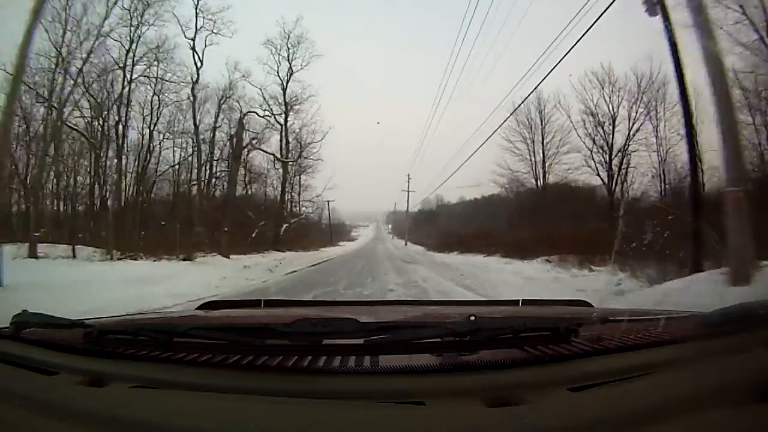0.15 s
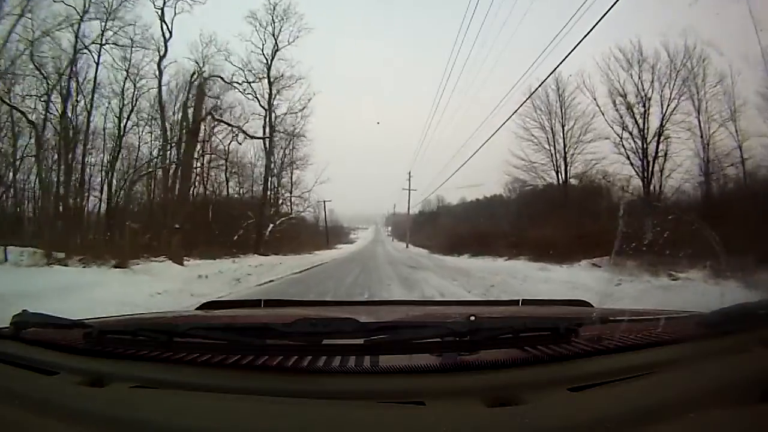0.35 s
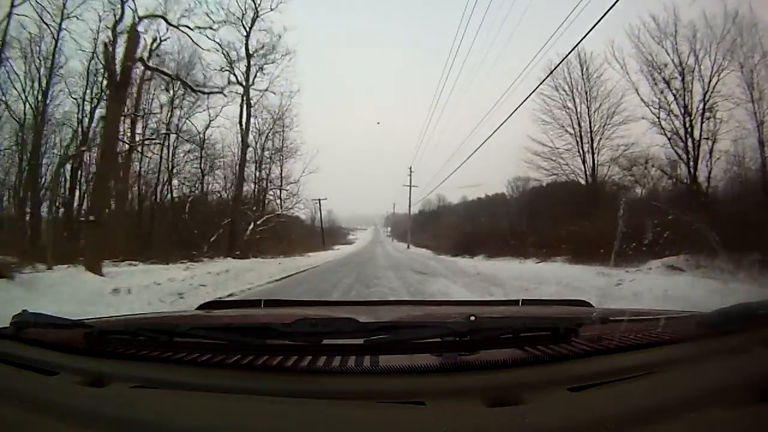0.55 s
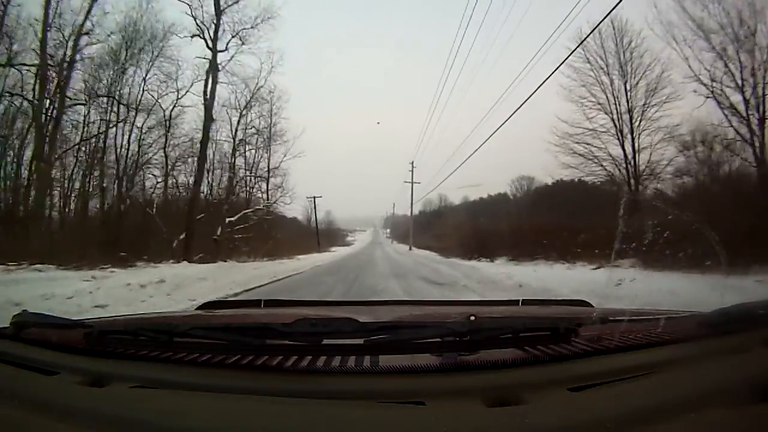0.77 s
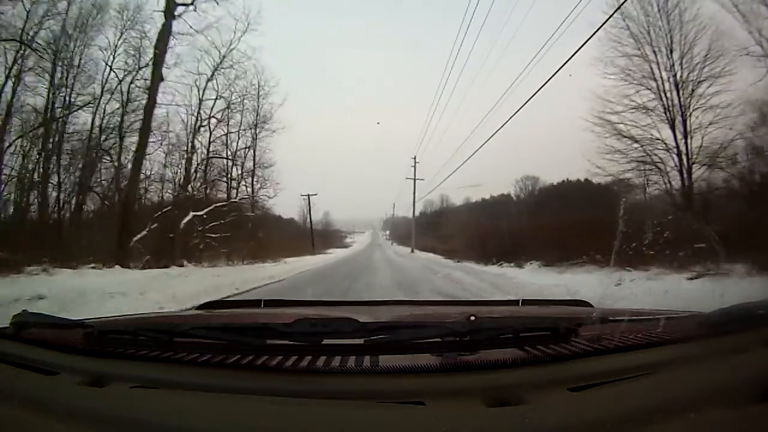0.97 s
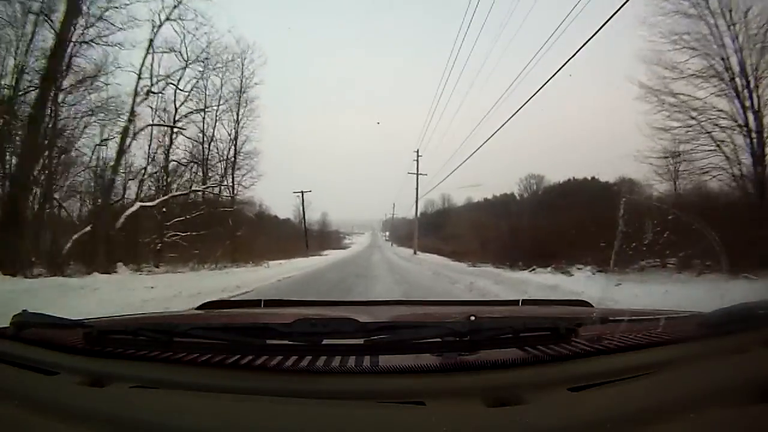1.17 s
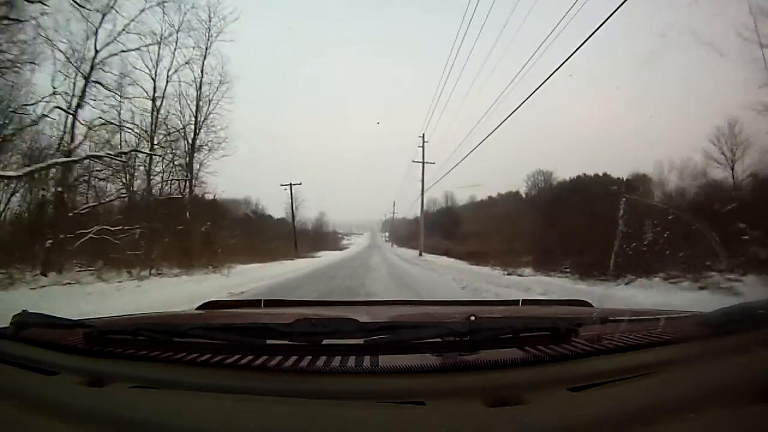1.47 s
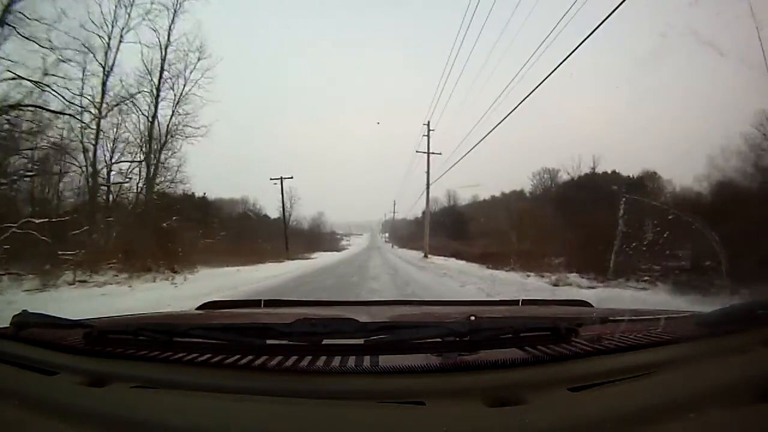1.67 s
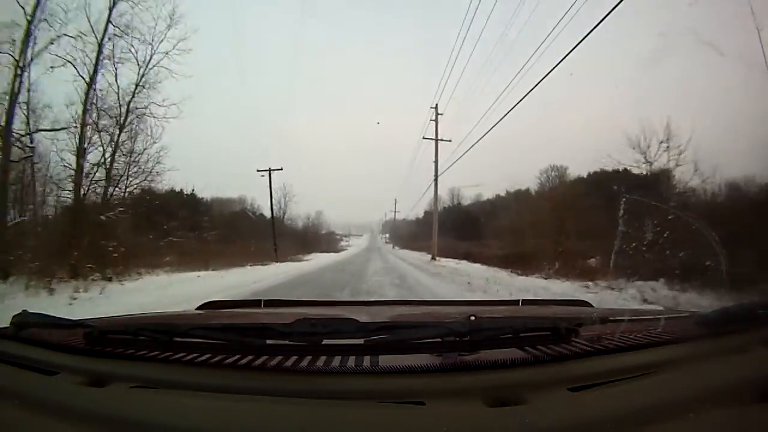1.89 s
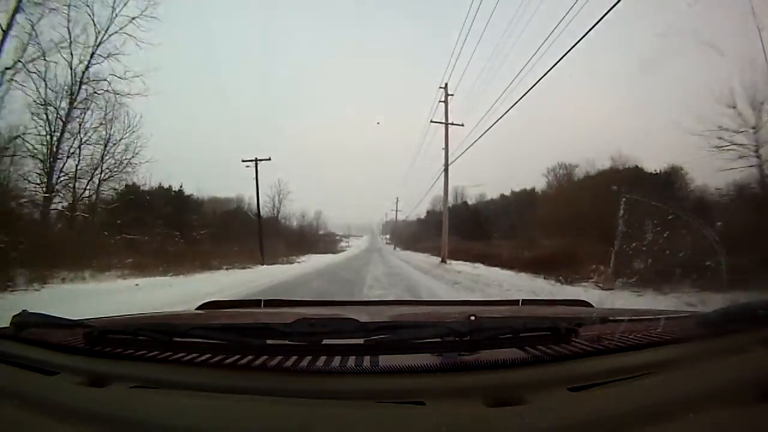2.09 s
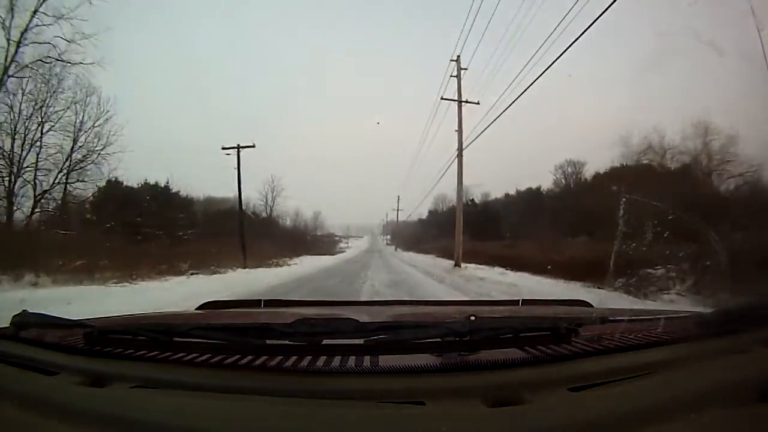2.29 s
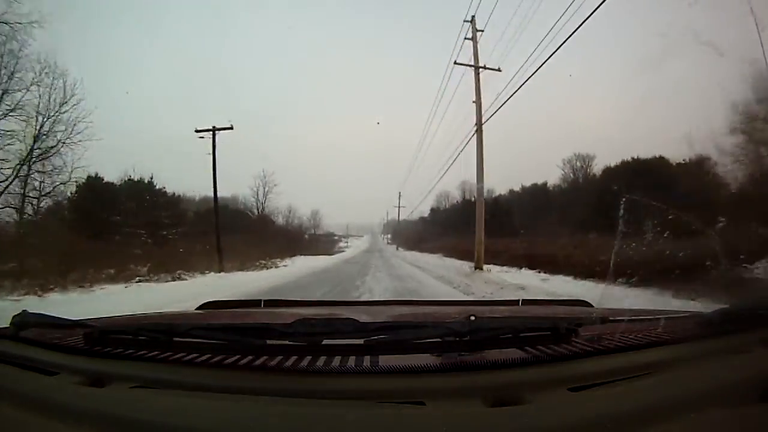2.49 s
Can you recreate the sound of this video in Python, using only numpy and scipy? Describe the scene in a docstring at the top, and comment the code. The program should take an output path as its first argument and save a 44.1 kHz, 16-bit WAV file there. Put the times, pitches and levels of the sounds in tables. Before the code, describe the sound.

Steady low engine hum and tyre rumble inside a moving car, with dull thuds and faint ticks

```python
"""Inside a car on a rough winter road, heard at the windscreen by the microphone of a small dash camera.
Phase-locked engine orders drone, two of them strong, over tyre and body rumble of coloured noise.
Road bumps thud through the floor as soft pulses; late on, a loose plastic part ticks as a few ringing modes.
The camera starts silent and fades in, its gain control steps down after broad peaks with a faint click,
and it samples slowly, holding each sample flat."""
import sys
import numpy as np
from scipy import signal
from scipy.fft import rfft, irfft
from scipy.io import wavfile
from scipy.ndimage import uniform_filter1d

SR = 44100
rng = np.random.default_rng(int(sys.argv[2]) if len(sys.argv) > 2 else 0)


def wav_record(signal):
    """Record a signal, one row per channel, as 16-bit PCM in the file named by sys.argv[1]."""
    frames = np.transpose(np.atleast_2d(signal))
    bounded = np.clip(frames, -1, 1)
    # unit amplitude maps onto the largest positive 16-bit level
    quanta = np.round(bounded * 32767).astype(np.int16)
    wavfile.write(sys.argv[1], SR, quanta)


N = 116424  # length in samples

# Engine: shaft speed/Hz, its gain/(Hz/s), the easing of that gain/(Hz/s^2), starting angle/turns
SPEED_HZ, GAIN_HZ_PER_S, EASE_HZ_PER_S2, START_TURNS = 38.029, .846, -.129, -.247
# Engine orders [multiple of shaft speed, rms level/dB, phase/turns]
ENGINE_ORDERS = [(2, -17, -0.0026), (3, -24.5, -0.17), (4, -41.5, 0.073), (5, -37.5, 0.15)]
WAVER_DB = 0.45  # rms drift of each order

# Spectrum of the road rumble without resonances [f/Hz, relative density level/dB]
ROAD_SPECTRUM = [(12, -53.5), (22, -31.5), (30, -32.5), (60, -33.5), (140, -41), (260, -46.5), (400, -52),
                 (620, -58), (1000, -63), (1450, -66.5), (1560, -75.5), (2300, -76.5), (3000, -77),
                 (4000, -82.5), (5000, -80.5), (6500, -80)]
# Cabin and body resonances, negative for dips [f/Hz, width/Hz, lift/dB]
CABIN_RESONANCES = [(38.1, 9, 5.5), (47.3, 9, 8), (166.6, 12, -4.5), (1010, 72, -6.5), (197.7, 43.4, 8.5),
                    (315.9, 25, 9.5), (532.7, 64, 6.5), (699, 60, 3.5), (1095, 47, 5), (1698, 91, 6.5),
                    (1954, 94, 6.5)]
# Roughness of the road over time, used relative to its mean [t/s, level/dB]
ROAD_ROUGHNESS = [(0.1, -31.5), (0.15, -32), (0.48, -29), (0.53, -22), (0.63, -36), (0.68, -30),
                  (1.49, -30), (1.52, -27.5), (1.57, -31), (1.59, -27.5), (1.82, -29.5), (1.92, -22),
                  (1.94, -28), (2.31, -28), (2.36, -29.5), (2.55, -33), (2.61, -20.5), (2.63, -35.5)]
ROAD_DB, SWELL_DB = -22, .5  # rumble level and its slow rms drift
LUMP_DB, ROUGH_SHARE = 1, .8  # rms of the random lumps, share of the roughness curve
LUMP_HZ = 500  # lumps and roughness act half as strongly here, less above

# Road bumps [t/s, push as signed peak amplitude, pitch/Hz]
ROAD_BUMPS = [(.113, .17, 90), (.385, .16, 80), (.561, -.32, 120), (.894, .15, 110), (1.009, .15, 100),
              (1.058, .2, 80), (1.131, -.12, 120), (1.265, .4, 90), (1.464, -.17, 90), (1.537, .24, 100),
              (1.741, .34, 80), (1.92, .2, 170), (1.9765, -.36, 85), (2.047, .17, 90), (2.11, .26, 70),
              (2.252, .19, 90), (2.409, -.22, 80), (2.485, -.18, 100), (2.613, -.2, 110)]
SWING = .9  # strength of the swing back

# Ticks of the loose plastic part [t/s, level/dB]
PLASTIC_TICKS = [(2.4612, -40), (2.464, -40.5), (2.473, -44)]
# Ringing modes of that part [f/Hz, level relative to the tick/dB, t60/s]
PLASTIC_MODES = [(3950, -10, .02), (4260, -4, 0.023), (4650, -10, .018), (5060, -2, 0.034),
                 (5380, -0.5, 0.017)]
CRACKLE_DB, CRACKLE_T60 = 2, 0.03  # level relative to the tick, 60 dB decay in s

# Camera microphone
ON_S, FADE_IN_S = 0.068, 0.01
LIMIT_DB, SENSE_S = -9.5, .0025  # threshold and averaging time of the level sensor
SQUEEZE, RECOVER_DB_PER_S = 1.1, 45.5  # dB cut per dB over the limit, fall of the sensed peak
STEP_DB, STEP_S, STEP_SPREAD, LAG_S = .9, .00032, .45, .0027  # step size, pace, rms unevenness, delay
GUARD_HZ, GUARD_DB_PER_KHZ = 5040, -12  # guard filter: corner and slope above it
EDGE_HZ = 15250  # final band limit


def amp(db):
    """Amplitude factor of a level in dB."""
    return 10 ** (np.asarray(db) / 20)


def evened(x):
    """Signal scaled to an rms of 1."""
    return x / np.sqrt(np.mean(x ** 2) + 1e-20)


def slow(t, top_hz):
    """Slow random drift of rms 1: sines of random phase, weaker towards top_hz."""
    drift = sum(np.sin(2 * np.pi * (f * t + rng.random())) / np.sqrt(f) for f in np.geomspace(.4, top_hz, 20))
    return evened(drift)


def engine(t):
    """Phase-locked orders of a shaft that gains speed gently, each wavering in level."""
    turns = START_TURNS + SPEED_HZ * t + GAIN_HZ_PER_S * t ** 2 / 2 + EASE_HZ_PER_S2 * t ** 3 / 3
    drone = np.zeros(N)
    for order, db, phase in ENGINE_ORDERS:
        level = np.sqrt(2) * amp(db + WAVER_DB * slow(t, 6.1))
        drone += level * np.cos(2 * np.pi * (round(order) * turns + phase))
    return drone


def road(t):
    """Noise coloured by the cabin, with lumps where the tyres meet rough ground."""
    frames, hz = N // 128 + 5, np.fft.rfftfreq(512, 1 / SR)
    real, imag = rng.standard_normal((frames, 257, 3)).T[:2]  # two of the three noise layers are used
    lumps = evened(uniform_filter1d(rng.standard_normal(frames), size=8))
    at_s, rough_db = np.transpose(ROAD_ROUGHNESS)
    rough_db = np.interp(np.arange(frames) * 128 / SR, at_s, rough_db - rough_db.mean())
    # unevenness of the ground moves the low end most
    frame_db = (LUMP_DB * lumps + ROUGH_SHARE * rough_db) / (1 + hz[:, None] / LUMP_HZ)
    noise = signal.istft((real + 1j * imag) * amp(frame_db), nperseg=512, noverlap=384)[1][:N]

    f = np.fft.rfftfreq(N, 1 / SR)
    at_hz, density_db = np.transpose(ROAD_SPECTRUM)
    colour_db = np.interp(np.log(f + 1), np.log(at_hz + 1), density_db, left=-70)
    for centre, width, lift in CABIN_RESONANCES:
        colour_db += lift / (1 + (2 * (f - centre) / width) ** 2)
    swell = amp(ROAD_DB + SWELL_DB * slow(t, 3.96))
    return swell * evened(irfft(rfft(noise) * amp(colour_db), N))


def bumps(t):
    """Each bump is one soft push of the floor with a small swing back on both sides."""
    thuds = np.zeros(N)
    for at_s, push, hz in ROAD_BUMPS:
        u = np.pi * hz * (t - at_s)
        thuds += push * (1 - SWING * u ** 2) * np.exp(-u ** 2)
    return thuds


def ticks(t):
    """Short decaying rings of a small plastic part, each with a crackle of high-passed noise."""
    out = np.zeros(N)
    high_pass = signal.butter(3, 3500, "high", fs=SR, output="sos")
    hiss = evened(signal.sosfilt(high_pass, rng.standard_normal(N)))
    for at_s, tick_db in PLASTIC_TICKS:
        since = np.maximum(t - at_s, 0)
        for hz, db, t60 in PLASTIC_MODES:
            out += amp(tick_db + db - 60 * since / t60) * np.sin(2 * np.pi * hz * since)
        out += amp(tick_db + CRACKLE_DB - 60 * since / CRACKLE_T60) * (since > 0) * hiss
    return out


def scene():
    """Sum of everything heard at the windscreen, one channel."""
    t = np.arange(N) / SR
    return (engine(t) + road(t) + bumps(t) + ticks(t))[None]


def gain_control(x, t):
    """Cuts level above a limit in small hard steps, with a lag, a limited attack pace and a slow recovery."""
    level_db = 20 * np.log10(abs(uniform_filter1d(abs(x), size=round(SENSE_S * SR))) + 1e-6)
    fall = RECOVER_DB_PER_S * t
    peak_db = np.maximum.accumulate(level_db + fall) - fall  # peak hold that sinks steadily
    over_db = np.maximum(peak_db - LIMIT_DB, 0)
    cut_db = SQUEEZE * np.interp(t - LAG_S, t, over_db)

    pace = 1 + STEP_SPREAD * evened(uniform_filter1d(rng.standard_normal(N), size=12))  # steps come unevenly
    rise = STEP_DB / STEP_S * np.cumsum(np.maximum(pace, 0)) / SR
    cut_db = np.minimum.accumulate(cut_db - rise) + rise  # the cut grows no faster than this pace
    return x * amp(-STEP_DB * np.round(cut_db / STEP_DB))


def record(dry):
    """Camera microphone: gain control, guard filter, fade-in, 12 kHz samples held flat, band limit."""
    t, f = np.arange(N) / SR, np.fft.rfftfreq(N, 1 / SR)
    x = gain_control(dry[0], t)
    guard_db = GUARD_DB_PER_KHZ * np.maximum(f - GUARD_HZ, 0) / 1000
    x = irfft(rfft(x) * amp(guard_db), N)
    x = x * np.clip((t - ON_S) / FADE_IN_S, 0, 1)
    samples = signal.resample_poly(x, 40, 147)  # 44.1 to 12 kHz
    held = signal.resample_poly(np.repeat(samples, 4), 147, 160)[:N]  # held at 48 kHz, back to 44.1 kHz
    band_limit = signal.firwin(1023, EDGE_HZ, window=("kaiser", 9), fs=SR)
    return signal.oaconvolve(held[None], band_limit[None], "same")


dry = scene()
out = record(dry)
wav_record(out)
```